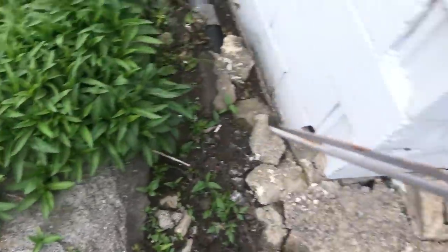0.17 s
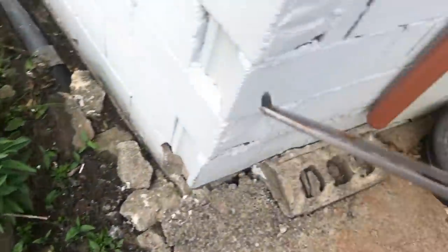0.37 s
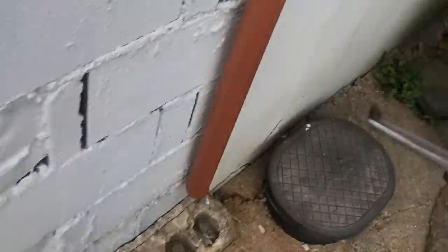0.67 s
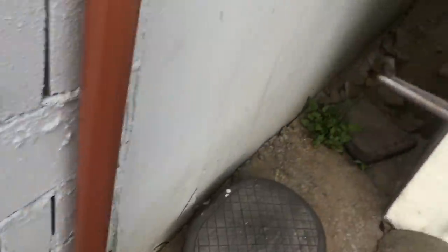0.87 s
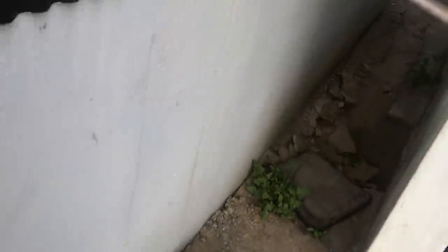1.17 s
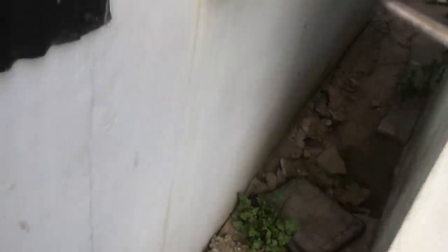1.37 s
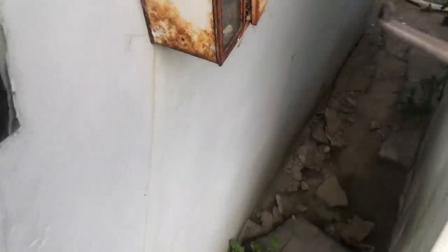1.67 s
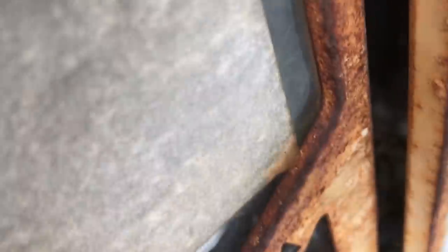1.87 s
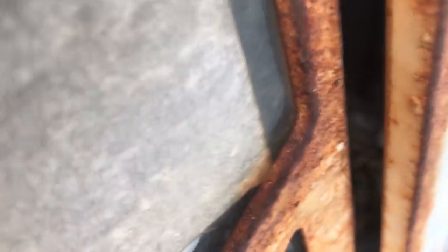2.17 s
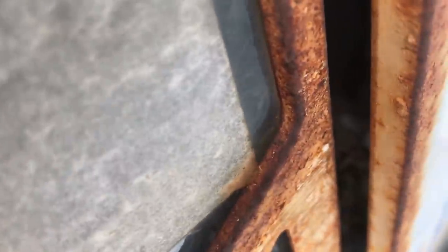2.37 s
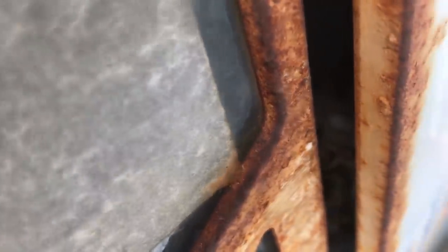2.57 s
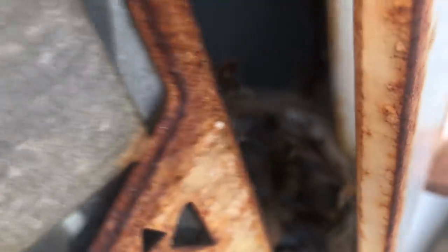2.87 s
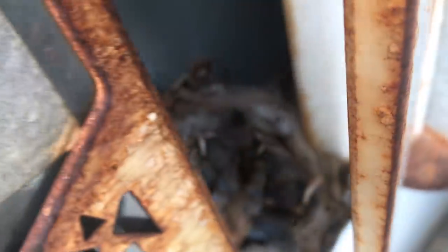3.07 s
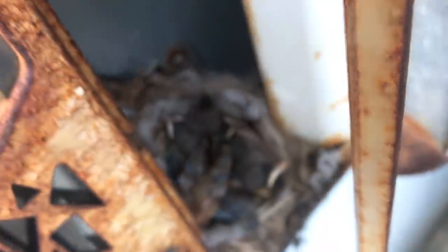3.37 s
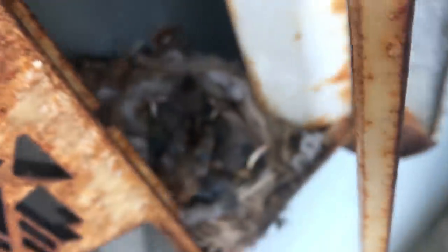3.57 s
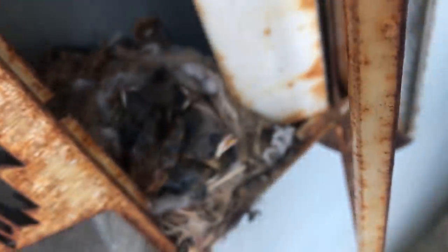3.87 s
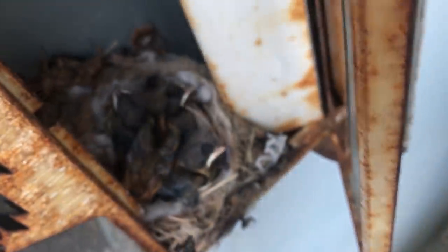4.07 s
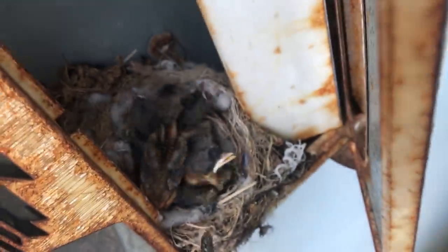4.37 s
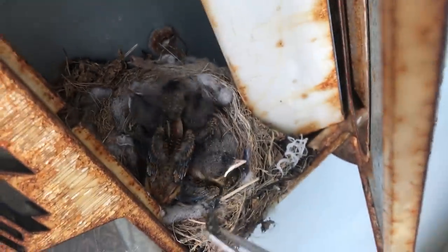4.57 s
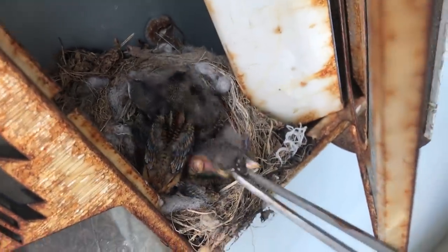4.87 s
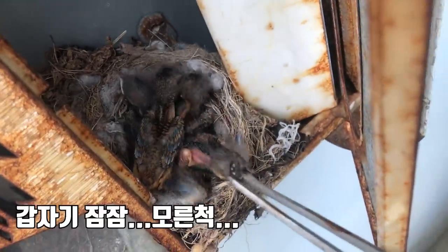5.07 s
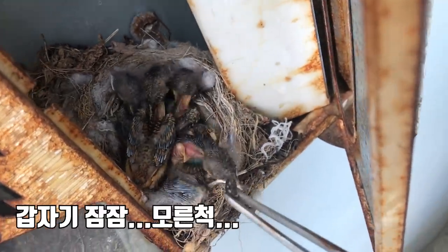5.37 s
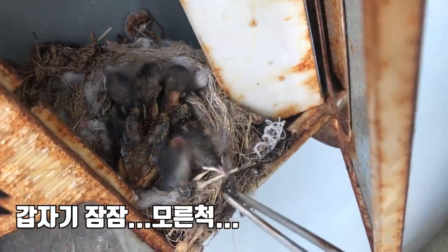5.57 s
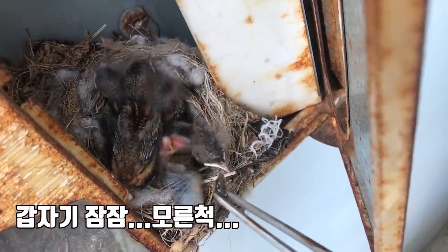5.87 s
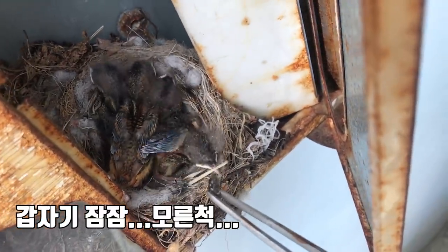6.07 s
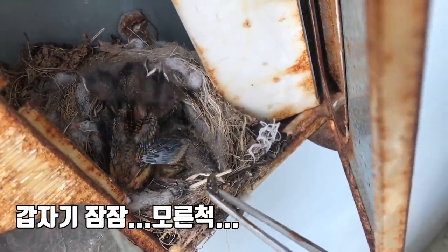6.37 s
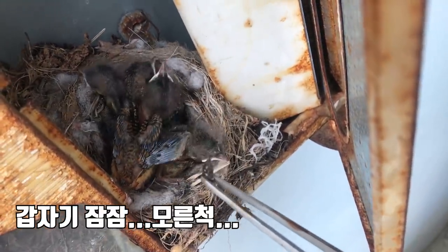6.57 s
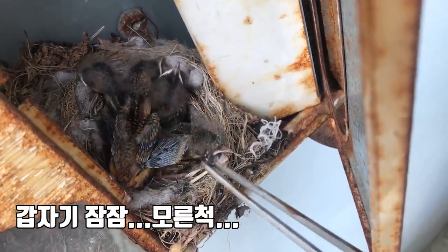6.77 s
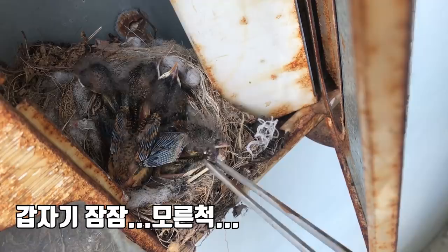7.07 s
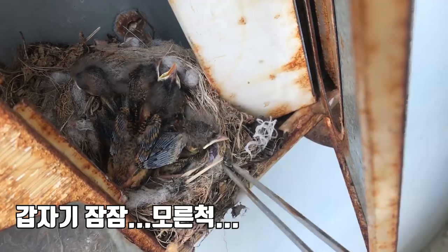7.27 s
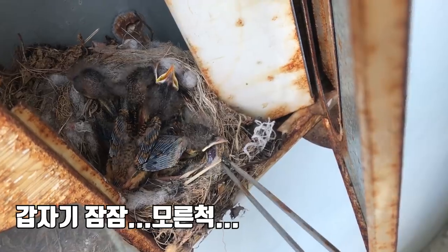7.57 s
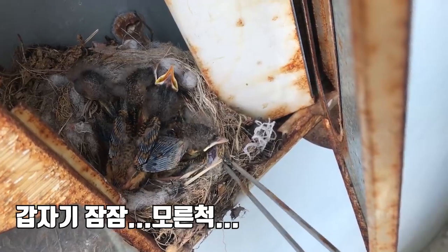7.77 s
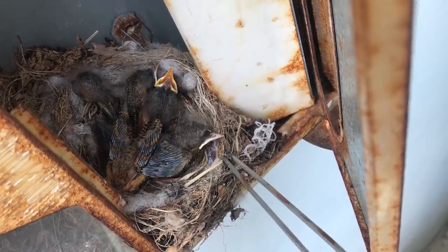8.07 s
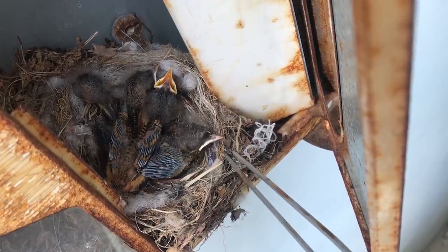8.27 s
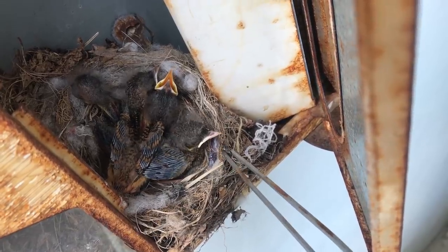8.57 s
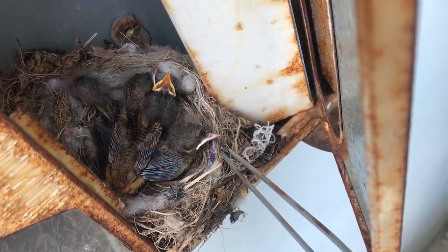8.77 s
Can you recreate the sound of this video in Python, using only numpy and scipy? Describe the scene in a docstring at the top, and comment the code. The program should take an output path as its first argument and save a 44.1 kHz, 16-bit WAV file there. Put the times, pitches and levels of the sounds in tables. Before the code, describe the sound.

Outdoors beside a house wall, baby birds beg faintly while shoes scuff grit and a far bird chirps in a quick run. A dull knock and one sharp click follow, then the cheeps are loud and close, buzzy and piercing, about two a second at most, with a sibling's thin peeps between. Tweezers tick lightly on rusty metal. Soft murmur, hiss and motor hum lie underneath; the microphone moves in to the nest.

```python
"""Nestlings beg in a rusty sheet-metal housing on a house wall: loud buzzy cheeps, and a sibling's thin peeps.
Each call is a whistle swept up and down by a fast trill, plus its octave and a noisy rasp.
Feeding tweezers tap the metal (damped modes, rattle, tick), and someone steps over grit (noise bursts).
A dull knock, one bright click and a far bird's gliding chirps are also heard.
Underneath: a murmur and hiss of shaped noise, a wavering motor hum and a far engine's rumble."""
import sys
import numpy as np
from scipy import signal
from scipy.fft import rfft, irfft
from scipy.io import wavfile
from scipy.ndimage import map_coordinates

SR = 44100
rng = np.random.default_rng(int(sys.argv[2]) if len(sys.argv) > 2 else 0)


def wav_record(signal):
    """Record a signal, one row per channel, as 16-bit PCM in the file named by sys.argv[1]."""
    frames = np.transpose(np.atleast_2d(signal))
    bounded = np.clip(frames, -1, 1)
    # unit amplitude maps onto the largest positive 16-bit level
    quanta = np.round(bounded * 32767).astype(np.int16)
    wavfile.write(sys.argv[1], SR, quanta)


N = 393372
TIME_S = np.arange(N) / SR


def gain_of(db):
    """Decibels to amplitude."""
    return 10 ** (np.asarray(db) / 20)


def evened(x):
    """Scales to rms 1."""
    return x / np.sqrt(np.mean(x ** 2) + 1e-20)


def read(points, hz):
    """Interpolates a frequency table on a log axis."""
    point_hz, value = np.transpose(points)
    return np.interp(np.log(hz + 1), np.log(point_hz + 1), value)


def follow(rows, at):
    """Interpolates every column of a curve table."""
    place, *columns = np.transpose(rows)
    return [np.interp(at, place, column) for column in columns]


def add(mix, start_s, sound):
    """Mixes a sound in at start_s."""
    part = mix[max(round(start_s * SR), 0):][:len(sound)]
    part += sound[:len(part)]


def coloured(x, spectrum):
    """Filters a signal by a spectrum table, to rms 1."""
    bin_hz = np.fft.rfftfreq(len(x), 1 / SR)
    return evened(irfft(rfft(x) * gain_of(read(spectrum, bin_hz)), len(x)))


def noise(size):
    """White noise."""
    return rng.standard_normal(size)


def drift(size, hz):
    """Smooth random curve through hz knots a second."""
    knots = rng.standard_normal(4096)
    return map_coordinates(knots, [np.arange(size) * hz / SR], order=2, mode="wrap")


def band(lo_hz, hi_hz):
    """Band-passed noise at rms 1."""
    sos = signal.butter(3, [lo_hz, hi_hz], "band", fs=SR, output="sos")
    return evened(signal.sosfilt(sos, noise(N)))


def sine(hz):
    """Sine of a varying frequency."""
    return np.sin(2 * np.pi * np.cumsum(hz) / SR)


# Yard decay: (frequency [Hz], t60 [s])
YARD_T60 = [(300, 0.14), (2000, 0.53), (7500, 0.15), (15000, 0.13)]


def yard(x):
    """Echo of the walls: sparse taps of random sign, each band dying at its own speed."""
    size = SR // 2
    echoes = rng.choice([-1., 1.], size) * (rng.random(size) < 4000 / SR)
    echoes[:round(.004 * SR)] = 0
    hz, t, z = signal.stft(echoes, SR, nperseg=256)
    decay_db = -60 * t / read(YARD_T60, hz)[:, None]
    tail = signal.istft(z * gain_of(decay_db), SR, nperseg=256)[1]
    return signal.fftconvolve(x, tail / np.linalg.norm(tail))[:N]


# Murmur spectrum: (frequency [Hz], relative level [dB per Hz])
MURMUR_SPECTRUM = [(20, -22), (32, -13.5), (48, 0.5), (90, 2.5), (160, -3.5), (260, -6.5), (420, -17),
                   (650, -10.5), (800, -17.5), (1400, -19.5), (2500, -27.5), (5000, -30.5), (16000, -53)]
# Murmur course, before murmur_lift_db: (time [s], level [dB])
MURMUR_COURSE = [(0.0, -60.5), (0.52, -64), (1.07, -62), (1.41, -64), (1.84, -64.5), (6.73, -65),
                 (8.7, -62.5), (8.92, -61.5)]
# Hiss course, before hiss_lift_db: (time [s], level [dB])
HISS_COURSE = [(0, -79), (2, -78.5), (3.8, -83.5), (4.7, -78.5), (5.2, -87), (8.9, -99.5)]
# Far motor: (mean frequency [Hz], level [dB])
MOTOR_HUM = [(58.6, -56), (123, -65.5)]
# Far engine's low band: (time [s], level [dB])
ENGINE_COURSE = [(0, -77), (5, -69.5), (6.8, -53.5), (7.2, -50.5), (8.9, -52)]


def outdoors(murmur_lift_db=7.5, hiss_lift_db=12.0, waver=0.2, drone_db=-8):
    """Shaped noise murmur, fine hiss, hum wavering in pitch and level, and an engine's two noise bands."""
    murmur_db = follow(MURMUR_COURSE, TIME_S)[0] + murmur_lift_db
    hiss_db = follow(HISS_COURSE, TIME_S)[0] + hiss_lift_db
    murmur = gain_of(murmur_db) * coloured(noise(N), MURMUR_SPECTRUM)
    hiss = gain_of(hiss_db) * band(2500, 17000)
    hum = np.zeros(N)
    for hz, db in MOTOR_HUM:
        level = gain_of(db) * np.sqrt(2) * (1 + waver * drift(N, 7))
        hum += level * sine(hz + 2.5 * drift(N, 6))
    engine = band(38, 50) + gain_of(drone_db) * band(110, 150)
    return murmur + hiss + hum + gain_of(follow(ENGINE_COURSE, TIME_S)[0]) * engine


def far_note(length_s, first_hz, last_hz, db, blur_hz=90, blur_share=.08):
    """One glide with an unsteady pitch."""
    size = int(length_s * SR)
    unsteady_hz = blur_hz + blur_share * abs(last_hz - first_hz)
    hz = np.linspace(first_hz, last_hz, size) + unsteady_hz * drift(size, 587)
    return gain_of(db) * sine(hz) * signal.windows.tukey(size, .5)


SONG_START_S, SONG_GAP_S, SONG_SLOWING_S = .712, .0632, .0014
SONG_DB, SONG_SOFT_DB, SONG_RISE_S = -57.5, 6.5, 0.095
CHIRP_S, CHIRP_TOP_HZ, CHIRP_END_HZ = .028, 5600, 3064
# Single notes: (time [s], length [s], first pitch [Hz], last pitch [Hz], level [dB])
CHATTER = [(2.393, .06, 5200, 5110, -65), (5.105, 0.092, 4100, 4020, -76), (6.238, 0.053, 3990, 3790, -70),
           (7.762, 0.074, 3730, 4030, -71), (8.313, 0.023, 5600, 2200, -60.5),
           (8.733, 0.021, 2810, 3960, -55)]


def far_bird(uneven_db=3.0, echo_db=-6, count=13):
    """A run of falling chirps that slows and swells, then single notes, all blurred by the yard echo."""
    out, s = np.zeros(N), SONG_START_S
    for k in range(count):
        softness_db = SONG_SOFT_DB * np.exp(-(s - SONG_START_S) / SONG_RISE_S)
        db = SONG_DB - softness_db + uneven_db * rng.standard_normal()
        add(out, s, far_note(CHIRP_S, CHIRP_TOP_HZ, CHIRP_END_HZ, db))
        s += SONG_GAP_S + SONG_SLOWING_S * k
    for s, *note in CHATTER:
        add(out, s, far_note(*note))
    return out + gain_of(echo_db) * yard(out)


# Scuffs of shoes, clothing and straw: (time [s], decay [s], thud level [dB], grit level [dB])
STEPS = [(0.079, 0.032, -70, -45.5), (0.13, 0.018, -63, -48.5), (0.244, 0.017, -73, -51.5),
         (0.808, 0.023, -54, -52), (0.871, 0.005, -39, -41.5), (.895, 0.01, -58, -40),
         (1.168, 0.011, -68, -54.5), (1.341, 0.016, -54, -43.5), (1.362, 0.036, -57, -45),
         (1.409, 0.033, -53.5, -45.5), (2.743, 0.043, -51.5, -77), (3.555, 0.35, -72, -63.5),
         (3.742, 0.025, -48.5, -57.5), (4.989, 0.068, -55.5, -55.5)]
# Thud spectrum: (frequency [Hz], relative level [dB])
THUD = [(40, -10), (90, -1.5), (300, 4.5), (700, -22.5), (1300, -21), (2500, -43.5)]
# Grit spectrum, also the metal's rattle: (frequency [Hz], relative level [dB])
GRIT = [(200, 10), (700, 7), (1100, 7.5), (2200, 2.5), (4000, -6), (8000, -6.5), (16000, -26.5)]


def steps(grain_db=4.5, echo_db=-9):
    """Each footfall or scuff is a dull push plus spiky noise of crushed grains, with Gaussian decay."""
    out, t = np.zeros(N), np.arange(SR // 4) / SR
    for s, decay_s, thud_db, grit_db in STEPS:
        spikes_db = grain_db * np.minimum(rng.exponential(1, len(t)), 5)
        grains = noise(len(t)) * gain_of(spikes_db)
        thud = gain_of(thud_db) * coloured(noise(len(t)), THUD)
        grit = gain_of(grit_db) * coloured(grains, GRIT)
        envelope = (1 - np.exp(-t / 0.0005)) * np.exp(-(t / decay_s) ** 2)
        add(out, s, (thud + grit) * envelope)
    return out + gain_of(echo_db) * yard(out)


# Knock modes: (frequency [Hz], relative level [dB], t60 [s])
KNOCK_MODES = [(95, 5.5, 0.013), (557, 0.5, 0.015), (1050, -17, 0.017)]


def knock(start_s=1.4927, level_db=-30.0):
    """One dull knock of three fast-damped modes."""
    out, t = np.zeros(N), np.arange(SR // 8) / SR
    for hz, db, t60_s in KNOCK_MODES:
        add(out, start_s, gain_of(level_db + db - 60 * t / t60_s) * np.sin(2 * np.pi * hz * t))
    return out


# Click spectrum: (frequency [Hz], relative level [dB])
CRACK = [(500, -19), (3000, -10), (7500, -8), (16000, -4)]


def snap(start_s=1.8358, crack_db=-28, ring_db=-21, ring_hz=7600, ring_s=0.0033, squeak_db=-35,
         squeak_hz=7350, sag_hz_per_s=20000, squeak_s=0.019, fizz_db=-42, fizz_s=0.014):
    """One sharp bright click: noise crack and short ring, trailing off in a hoarse falling squeak."""
    out, t = np.zeros(N), np.arange(SR // 20) / SR
    crack = gain_of(crack_db) * coloured(noise(len(t)), CRACK) * np.exp(-t / 0.00024)
    squeak = gain_of(squeak_db) * sine(squeak_hz - sag_hz_per_s * t) * np.exp(-(t / squeak_s) ** 2)
    fizz = gain_of(fizz_db) * coloured(noise(len(t)), RASP) * np.exp(-t / fizz_s)
    ring = gain_of(ring_db) * np.sin(2 * np.pi * ring_hz * t) * np.exp(-t / ring_s)
    add(out, start_s, crack + squeak + fizz + ring)
    return out + gain_of(-17) * yard(out)


# Tweezers and beaks: (time [s], ring gain [dB], tick level [dB], ring tilt about 2 kHz [dB per octave])
TAPS = [(4.871, -67, -42.5, 0), (4.988, -57, -42, 5), (6.162, -82, -47.5, -2), (6.933, -48.5, -45, 0),
        (6.968, -66, -57, -16), (7.332, -56.5, -51.5, -13), (8.034, -57.5, -68, -7), (8.675, -50, -62, 5.5)]
# Housing modes: (frequency [Hz], relative level [dB], t60 [s])
METAL = [(954, -16, 0.48), (1003, -26, 0.31), (1290, -35, 0.12), (1720, -12.5, 0.22), (2065, 2, 0.14),
         (2144, 0.5, 0.047), (2590, 1.5, 0.036), (2684, -7, 0.16), (3355, -1.5, 0.046), (4154, 1.5, 0.069),
         (4220, -2, 0.04), (4620, -8.5, 0.096), (5685, -10, 0.051), (6180, -1.5, 0.064)]


def taps(tick_s=0.0013, rattle_db=1, rattle_s=0.035):
    """A dry tick sets the housing's modes ringing, and its loose sheets rattle briefly as noise."""
    out, t = np.zeros(N), np.arange(SR // 3) / SR
    for s, ring_db, tick_db, tilt_db in TAPS:
        ring = np.zeros(len(t))
        for hz, db, t60_s in METAL:
            mode_db = db + tilt_db * np.log2(hz / 2000) - 60 * t / t60_s
            ring += gain_of(mode_db) * np.sin(2 * np.pi * (hz * t + rng.random()))
        rattle = gain_of(rattle_db) * coloured(noise(len(t)), GRIT) * np.exp(-t / rattle_s)
        tick = noise(len(t)) * np.exp(-t / tick_s)
        onset = 1 - np.exp(-t / 0.00078)
        add(out, s, gain_of(ring_db) * (ring + rattle) * onset + gain_of(tick_db) * tick)
    return out + gain_of(-16) * yard(out)


# One trill cycle: (share of cycle, share of sweep, share of fading)
TRILL = [(0, 1, 1), (.1, .86, .95), (.2, .55, .45), (.28, .36, .08), (.42, .13, -.08), (.55, 0, .15),
         (.66, .14, .55), (.8, .58, .9), (.92, .92, 1), (1, 1, 1)]
# Throat and open beak response: (frequency [Hz], gain [dB])
BEAK = [(5200, -4), (6300, 2.5), (8300, -3), (8900, -11.5), (11800, -8), (13500, 3.5), (15500, -2),
        (17000, -13)]
# Air noise of a call: (frequency [Hz], relative level [dB])
RASP = [(2500, -29), (4000, -16.5), (5500, -12.5), (7500, 12.5), (9000, 0), (11500, -5), (14000, 4.5),
        (16000, -4.5)]
ATTACK_S = 0.0018  # linear, at both ends


def call(row, shape, voice, slowing, delay, jitter, wobble, flutter_db):
    """Trilled whistle, octave and rasp, shaped by effort: loud as each sweep falls, fading as it climbs."""
    _, length_s, pitch_hz, db, octave_db = row
    effort_db = db - voice["usual_db"]
    sweep_hz = voice["sweep_hz"] + voice["sweep_hz_per_db"] * effort_db
    fade_db = voice["fade_db"] * gain_of(voice["fade_growth"] * effort_db)
    rasp_db = voice["rasp_db"] - voice["clearing"] * effort_db
    t = np.arange(int(length_s * SR)) / SR
    arch, depth, swell_db = follow(shape, t / length_s)

    cycle = voice["trill_hz"] * t * (1 - slowing * t) + .5  # starts near the bottom of a sweep
    cycle -= delay * np.minimum(voice["trill_hz"] * t, 1)  # longer first trill
    height, fading = follow(TRILL, cycle % 1)
    hz = pitch_hz * arch + sweep_hz * depth * height
    hz *= 1 + jitter * drift(len(t), 1500) + wobble * drift(len(t), 130)  # unsteady young voice
    phase = 2 * np.pi * np.cumsum(hz) / SR

    push_db = db + swell_db - fade_db * depth * fading + flutter_db * drift(len(t), 208.4)
    tone = gain_of(read(BEAK, hz)) * np.sin(phase)
    below_nyquist = 2 * hz < SR / 2
    octave = gain_of(octave_db + read(BEAK, 2 * hz)) * np.sin(2 * phase) * below_nyquist
    rasp = gain_of(rasp_db + .3 * swell_db) * coloured(noise(len(t)), RASP)
    edges = np.minimum(np.minimum(t, length_s - t) / ATTACK_S, 1)
    return gain_of(push_db) * (tone + octave + rasp) * edges


# Voices: trill rate; effort (level above usual_db) sets sweep width, deepens fading, clears the rasp
CHEEPER = dict(trill_hz=70.96, usual_db=-20, sweep_hz=4436, sweep_hz_per_db=-69.5, fade_db=20.5, fade_growth=0.37, rasp_db=-13.5, clearing=0.39)
PEEPER = dict(trill_hz=64.2, usual_db=-35, sweep_hz=1450, sweep_hz_per_db=84.5, fade_db=8.5, fade_growth=.35, rasp_db=-24, clearing=.1)
# Calls: (time [s], length [s], base pitch [Hz], level [dB], octave gain [dB])
CHEEPS = [(0.154, 0.14, 6440, -49.5, -3), (0.519, .116, 6670, -44, -2), (0.854, 0.15, 6500, -37.5, -6),
          (1.219, 0.14, 6310, -34, -9.5), (1.566, 0.13, 6500, -32, -8), (2.145, 0.14, 6870, -17, -10.5),
          (2.744, .12, 7000, -18, -11), (3.273, 0.12, 6720, -15, -12), (3.9393, 0.12, 6610, -15.5, -7.5),
          (4.4518, 0.11, 6620, -15, -15), (4.9545, 0.12, 6074, -20, -18.5),
          (5.756, .117, 5670, -25.5, -7.5), (6.5293, 0.12, 5840, -25, -6.5),
          (7.237, .11, 5990, -24.5, -11.5), (7.9105, 0.11, 6230, -23, -11),
          (8.4658, 0.12, 6650, -20, -13.5)]
PEEPS = [(0.241, 0.1, 6960, -52.5, -4), (1.138, .11, 6760, -40, -17), (1.9286, 0.07, 7450, -32, -19),
         (2.032, 0.046, 7600, -44.5, -12), (2.4296, 0.043, 7200, -47, -9), (2.495, 0.094, 6880, -23, -14),
         (2.9256, 0.051, 7400, -45, -9), (3.599, .023, 6920, -38.5, -21), (3.6288, 0.058, 7310, -40.5, -13),
         (4.258, 0.046, 6380, -39.5, -10), (4.276, .056, 7260, -40, -12), (4.8725, 0.048, 7730, -33, -16),
         (5.364, 0.058, 7480, -32.5, -13), (5.832, 0.053, 7200, -32.5, -15),
         (6.1229, 0.047, 7600, -36.5, -10), (6.351, 0.064, 7560, -28.5, -9.5),
         (6.689, 0.048, 7560, -40, -19), (6.9583, 0.054, 7540, -35, -7), (7.325, 0.054, 7420, -41.5, -8),
         (7.631, 0.065, 7600, -39.5, -1.5), (8.138, 0.053, 7430, -39, -7), (8.6318, .052, 7170, -40.5, -9)]
# Course of a call: (share of length, pitch factor, share of full sweep, gain [dB])
CHEEP_SHAPE = [(0, 1.05, .65, -11.5), (.12, 1.0, .95, -5.5), (.3, .98, .95, -1), (.55, 1.04, 1, 1.5),
               (.76, 1.09, .65, 0), (.88, 1.08, .22, -11), (1, 1.05, .06, -23)]
PEEP_SHAPE = [(0, 1.01, 0.66, -6.5), (.12, 1.0, .9, -6), (.3, 1.0, 1.0, -2), (.55, 1.02, .95, 0),
              (.76, 1.04, .6, -1.5), (.88, 1.02, .25, -11), (1, .98, .05, -13.5)]
# Reflections around the nest: (delay [s], gain [signed amplitude])
HOUSING = [(.0008, 0.043), (.0014, -0.14), (.0019, -0.36), (.0027, 0.16), (.0037, .16), (.0052, -0.14)]
# Yard echo relative to the direct calls; its fall brings the nest closer: (time [s], level [dB])
NEST_ECHO = [(0, -3), (1.3, -12), (2.2, -15), (3.3, -24.5), (8.9, -18)]


def nestlings():
    """Both voices; housing reflections beat against the sweeps and make them flutter."""
    voice = np.zeros(N)
    for row in CHEEPS:
        add(voice, row[0], call(row, CHEEP_SHAPE, CHEEPER, slowing=0.68, delay=0.13,
                                jitter=.018, wobble=0.015, flutter_db=0.4))
    for row in PEEPS:
        add(voice, row[0], call(row, PEEP_SHAPE, PEEPER, slowing=.6, delay=0.25,
                                jitter=0.005494, wobble=0.01, flutter_db=4.0))
    near = voice.copy()
    for delay_s, gain in HOUSING:
        add(near, delay_s, gain * voice)
    wet = gain_of(follow(NEST_ECHO, TIME_S)[0])
    return (near + wet * yard(near)) / np.sqrt(1 + wet ** 2)


def scene():
    """Sum of all sources, one channel."""
    background = outdoors() + far_bird()
    handling = steps() + knock() + snap() + taps()
    return (background + handling + nestlings())[None]


def record(dry):
    """Steep low-pass at 15950 Hz."""
    lowpass = signal.firwin(401, 15950, window=("kaiser", 8), fs=SR)
    return signal.oaconvolve(dry, lowpass[None], "same")


dry = scene()
out = record(dry)
wav_record(out)
```